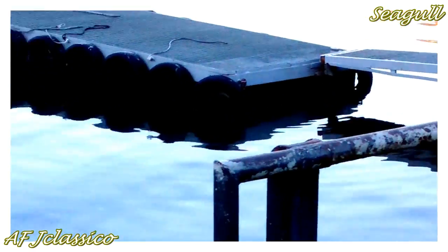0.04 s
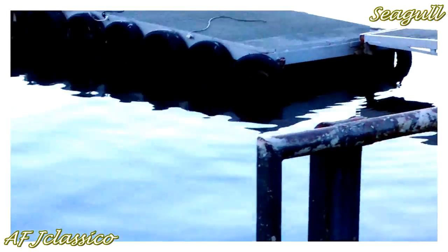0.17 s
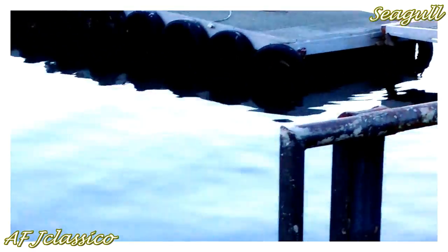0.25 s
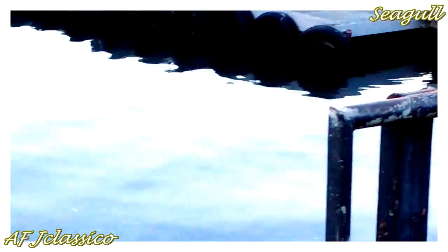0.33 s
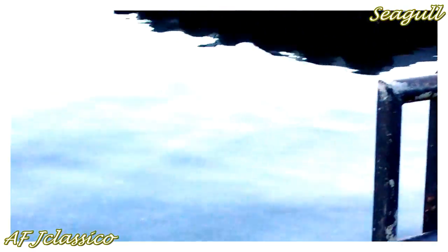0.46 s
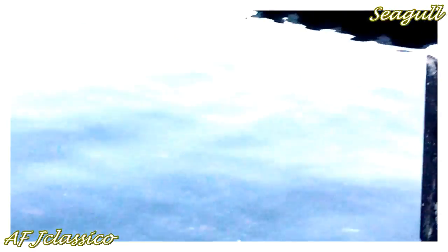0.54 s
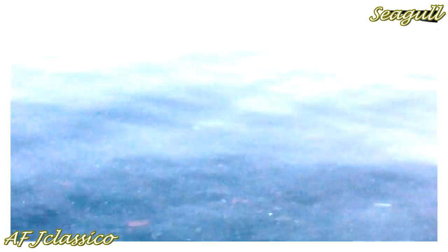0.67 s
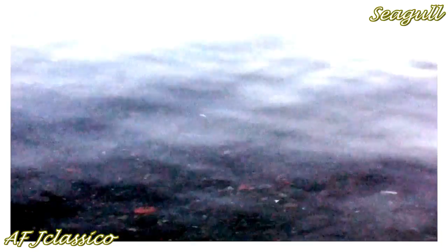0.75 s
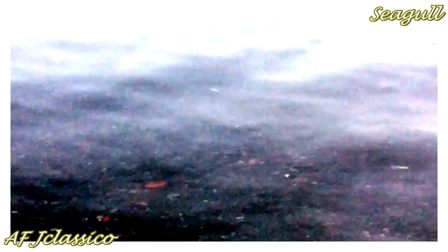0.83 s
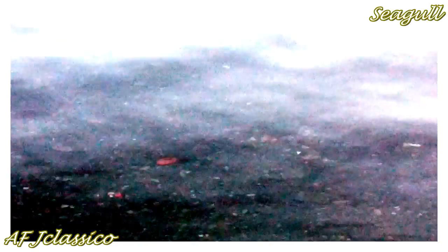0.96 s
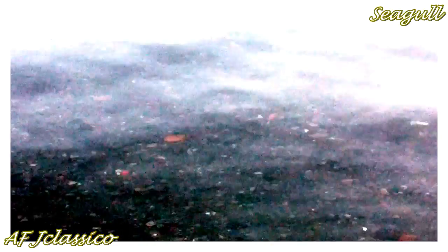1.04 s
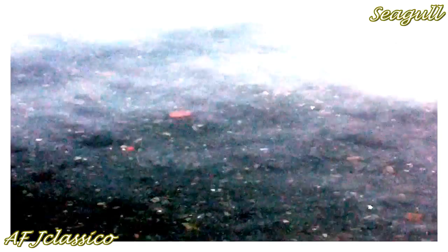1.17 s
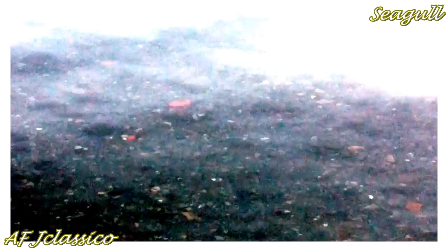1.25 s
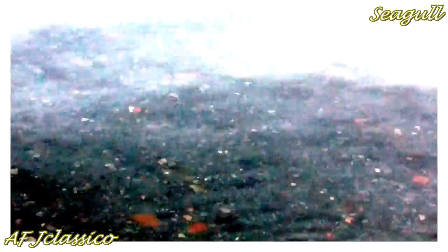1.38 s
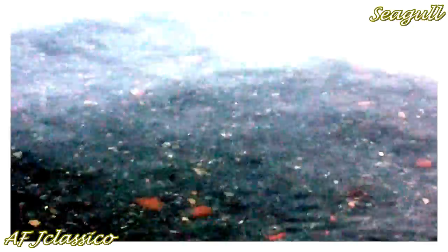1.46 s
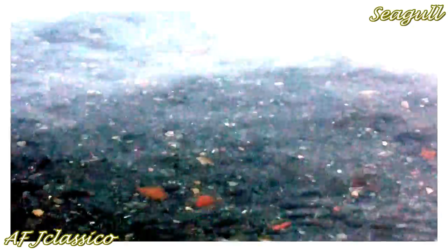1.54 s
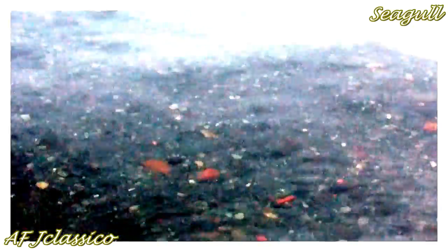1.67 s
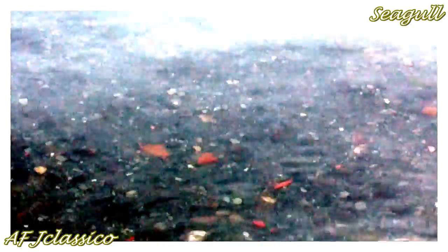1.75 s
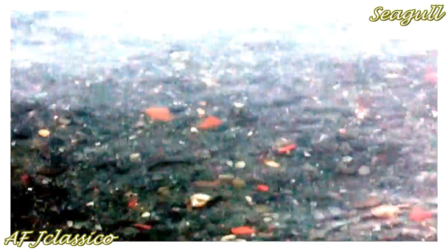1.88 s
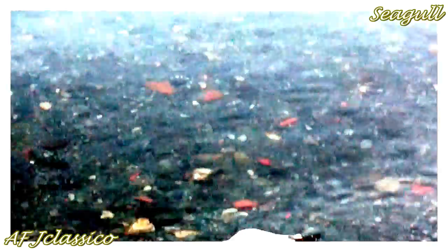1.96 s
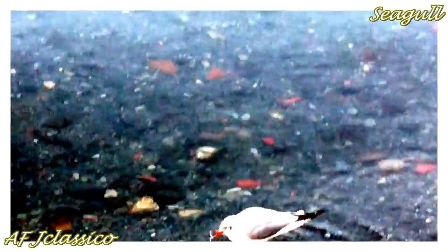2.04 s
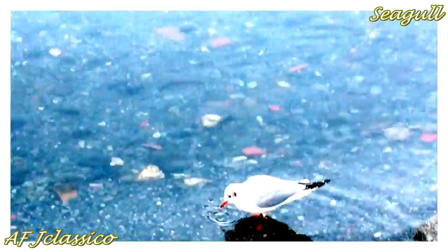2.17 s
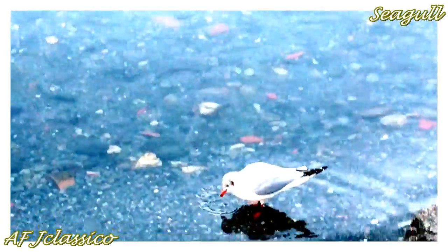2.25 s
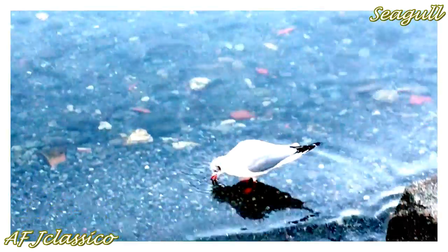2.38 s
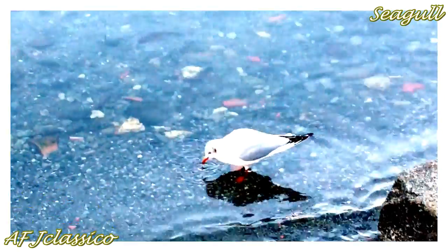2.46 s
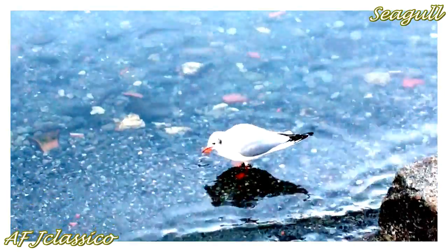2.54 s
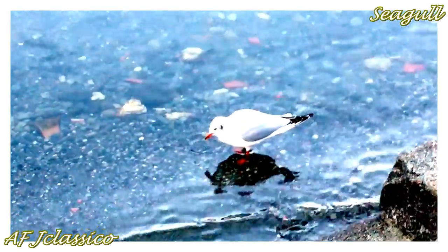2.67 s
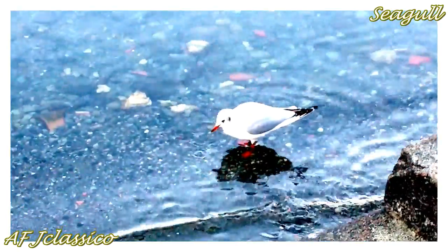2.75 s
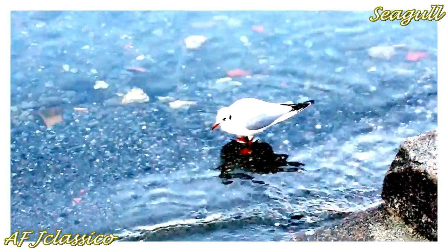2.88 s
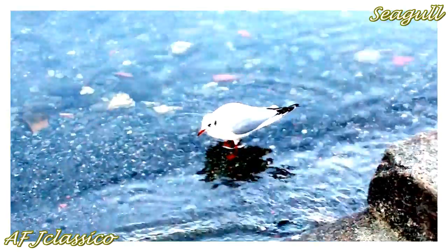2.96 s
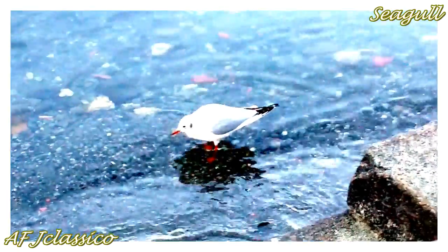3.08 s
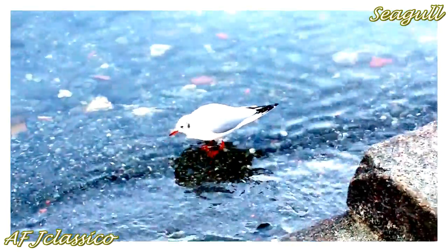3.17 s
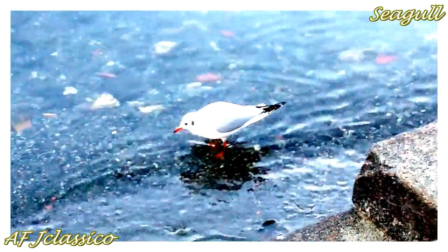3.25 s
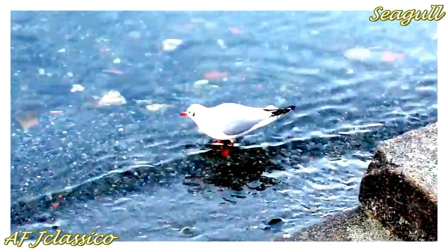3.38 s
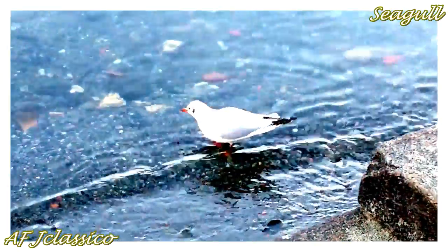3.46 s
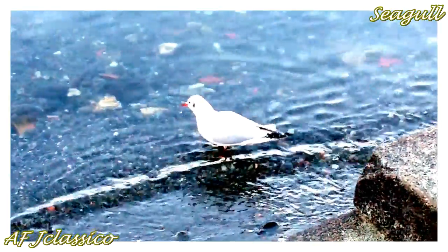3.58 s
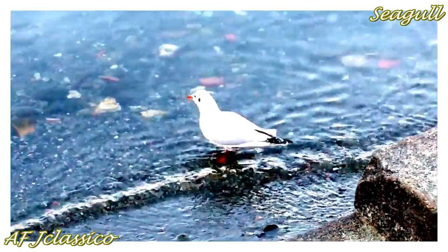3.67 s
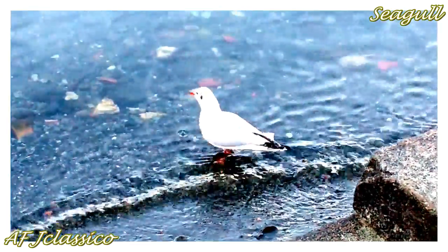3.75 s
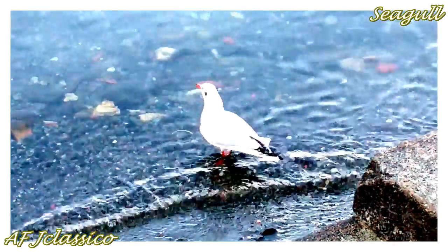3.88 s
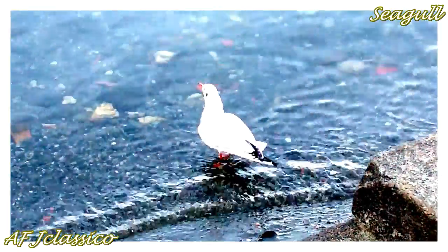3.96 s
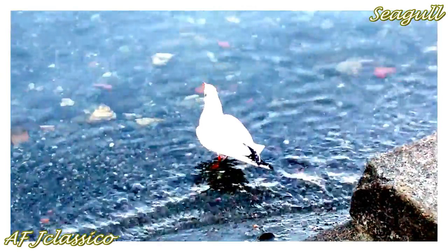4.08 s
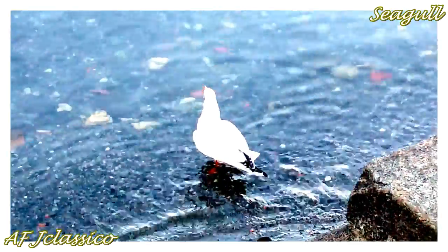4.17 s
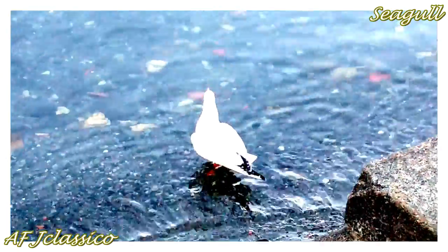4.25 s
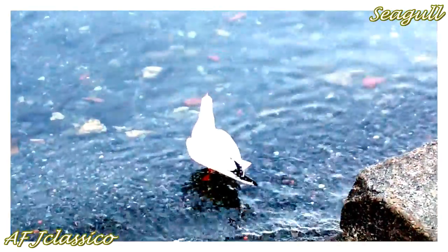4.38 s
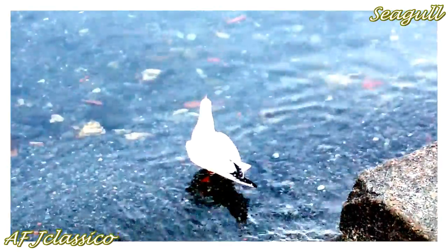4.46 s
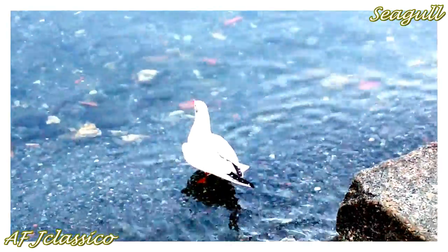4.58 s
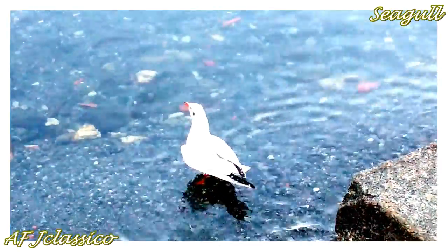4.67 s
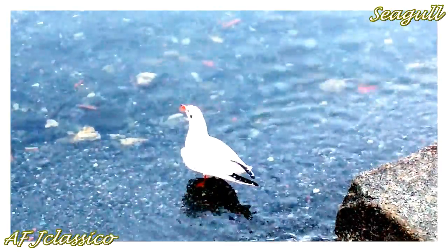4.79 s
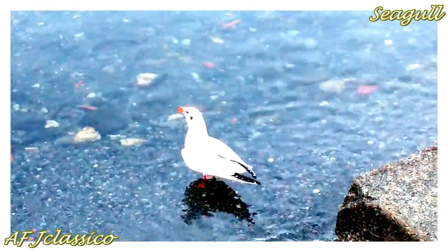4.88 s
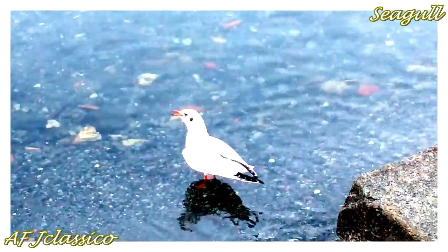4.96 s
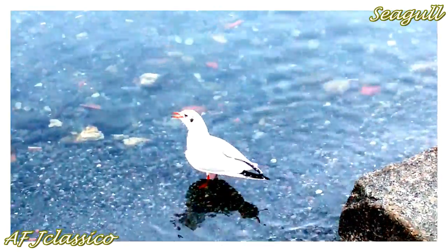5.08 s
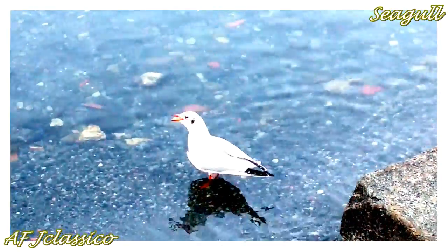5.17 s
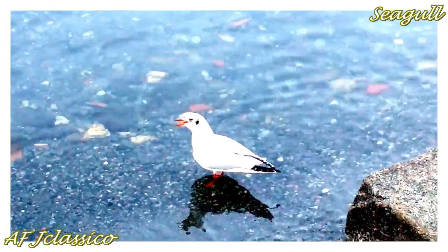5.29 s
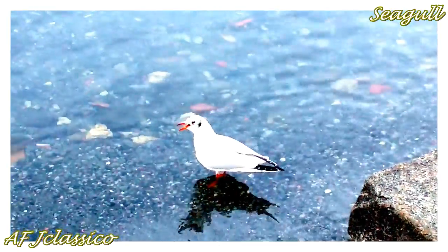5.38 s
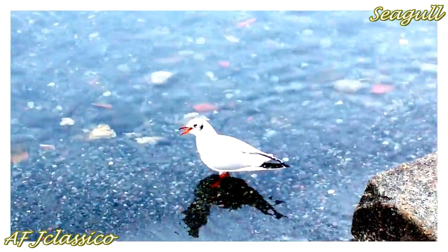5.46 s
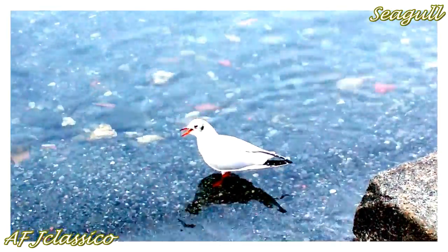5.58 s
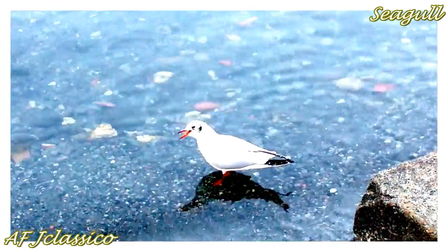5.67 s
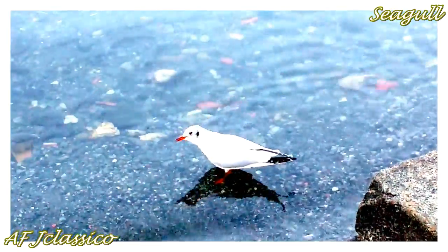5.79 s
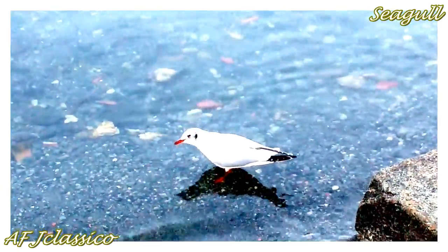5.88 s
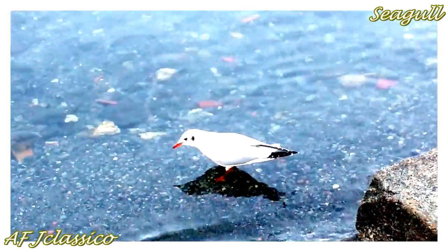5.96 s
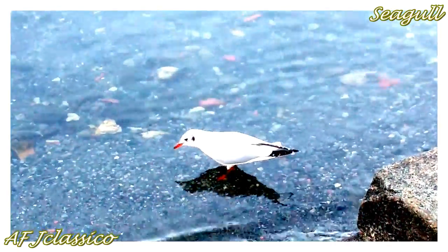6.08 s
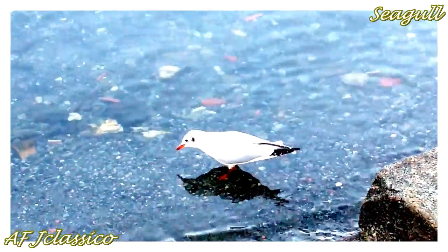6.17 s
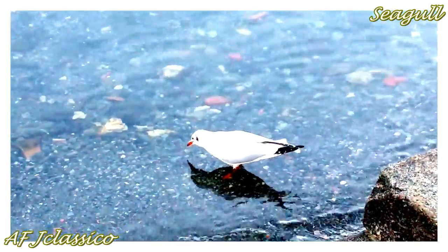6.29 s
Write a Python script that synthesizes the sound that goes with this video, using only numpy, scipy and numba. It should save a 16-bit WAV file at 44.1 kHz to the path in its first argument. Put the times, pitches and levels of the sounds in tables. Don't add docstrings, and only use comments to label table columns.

```python
import sys
import numpy as np
from scipy import signal
from scipy.fft import rfft, irfft, next_fast_len
from scipy.io import wavfile
from scipy.ndimage import uniform_filter1d
from numba import njit

SR = 44100
rng = np.random.default_rng(int(sys.argv[2]) if len(sys.argv) > 2 else 0)


def to_linear_factor(level_db):
    exponent = np.asarray(level_db, float) / 20
    return 10 ** exponent


def store_pcm(level_fs):
    pcm = np.round(np.clip(level_fs, -1, 1) * 32767).astype(np.int16)
    wavfile.write(sys.argv[1], SR, np.atleast_2d(pcm).T)


N = 279153

# (f/Hz, level/dB)
RUSH_COLOUR = [(15, -43), (25, -13.5), (80, -2.5), (130, -5.5), (161, -7), (195, -6), (317, -10),
               (439, -15.5), (641, -12.5), (734, -14), (863, -13), (1070, -13), (2050, -22.5),
               (3160, -33.5), (16000, -44.5)]
# (f/Hz, left-right level/dB, likeness/0-1)
RUSH_SIDES = [(60, 0.6, 0.99), (296, -2, 0.98), (680, -1, 0.82), (1260, -4.5, 0.89), (2200, -6.5, 0.48),
              (3360, 1, 0.3), (8440, -4, 0), (14100, 2, 0.2)]
# (f/Hz, left-right level/dB, likeness/0-1)
RIGHT_SIDES = [(600, 0, 0), (1200, -5.5, 0), (2000, -6, 0), (2740, 1, 0), (5430, -15.5, 0),
               (8400, -69, 0.3), (14400, -9, 0.1)]
# (f/Hz, left-right level/dB, likeness/0-1)
AHEAD_SIDES = [(920, 2.5, 0.24), (1420, 8.5, 0.28), (2000, 6.5, 0.081), (3420, 0, 0.14),
               (5560, -19.5, 0.56), (8000, -48, .2)]
# (f/Hz, delay/s)
RIGHT_DELAY = [(200, 0.0003), (950, 0.00024), (1210, 0.00037), (2200, 0.0004594)]
# (t/s, peak level/dB)
WATER_TICKS = [(0.1685, -48), (0.1836, -40), (0.3264, -37), (0.4444, -61), (0.545, -37), (0.559, -60),
               (0.5617, -32.5), (0.632, -38), (0.666, -37), (0.7078, -64), (0.763, -29.5), (0.8844, -50),
               (1.0056, -38), (1.1024, -47), (1.1706, -43), (1.245, -38), (1.313, -39), (1.3494, -43),
               (1.637, -42.5), (1.658, -45), (1.698, -39), (2.939, -43), (3.2144, -49)]
# (t/s, level/dB, f/Hz, length/s)
WATER_DROPS = [
    (.452, -44, 3800, .0025),
    (.536, -47, 3400, .0025),
]

# (t/s, effort level/dB, bill opening/0-1, high windpipe f/Hz, bursts/Hz)
LONE_CALLS = [
    [(1.72, -55, 0.15, 2100, 94), (1.742, -44.5, 0.7, 2100, 89), (1.788, -40.5, 0.61, 2070, 90.1),
     (1.872, -39.5, 0.56, 2120, 86.5), (1.936, -38.5, 0.61, 2130, 90.3), (2.168, -36.5, 0.48, 1950, 80),
     (2.19, -41, 0.4, 1840, 81)],
    [(2.19, -40, 0.21, 1990, 73), (2.368, -46, 0.35, 1860, 69.46), (2.494, -46, 0.34, 1870, 55.74),
     (2.682, -49, 0.34, 1820, 54.5), (2.846, -51, 0.37, 1780, 51.9), (2.902, -53.5, 0.3, 1740, 51.3),
     (2.93, -72, 0.3, 1840, 54)],
]
QUARREL_CALLS = [
    [(3.44, -54, 0.081, 2090, 55), (3.474, -49.5, 0.15, 2000, 56.8), (3.604, -42, 0.45, 1770, 67.5),
     (3.656, -39, 0.6, 1840, 71.6), (3.74, -39, 0.44, 1730, 86), (3.852, -36.5, 0.38, 1620, 83.54),
     (4.058, -31.5, 0.58, 1820, 88.6), (4.176, -33.5, 0.77, 1850, 80.6), (4.21, -38, 0.35, 1700, 80.5)],
    [(4.352, -56, 0.35, 1880, 87), (4.361, -40.5, 0.87, 1780, 91.2), (4.472, -37.5, 0.89, 1650, 87.9),
     (4.556, -35, 0.82, 1630, 86.7), (4.6, -37.5, 0.9, 2090, 90.5), (4.618, -43.5, 0.82, 2000, 91),
     (4.63, -50, 0.27, 2000, 87.5)],
    [(4.77, -56, 0.37, 1950, 67.3), (4.779, -45.5, 0.91, 1690, 68.8), (4.802, -46, 0.94, 1790, 68.1),
     (4.91, -44, 1, 1650, 69.3), (4.95, -43.5, 0.3, 1730, 67.6)],
]
CHORUS_CALLS = [
    [(4.95, -39, 0.4, 1580, 85.6), (4.988, -32, 0.39, 1630, 78.5), (5.066, -28.5, 0.5, 1610, 78.9),
     (5.092, -33.5, 0.52, 1650, 83), (5.114, -27, 0.48, 1600, 82.6), (5.218, -30.5, 0.57, 1730, 85.4),
     (5.35, -25, 0.49, 1670, 78.3)],
    [(5.35, -25.5, 0.41, 1670, 77.4), (5.396, -27.5, 0.57, 1810, 84.7), (5.502, -28, 0.41, 1590, 81.9),
     (5.582, -29.5, 0.56, 1750, 71.8), (5.66, -28.5, 0.46, 1810, 84.5), (5.8, -30, 0.38, 1800, 76.6),
     (5.902, -32.5, 0.61, 2220, 69.6), (5.97, -38, 0.38, 2200, 68.5)],
    [(5.97, -34.5, 0.27, 1850, 66.6), (6.094, -37.5, 0.59, 1840, 73.6), (6.194, -32, 0.49, 1390, 83.5),
     (6.252, -34, 0.49, 1550, 81.3), (6.28, -35.5, 0.22, 1940, 61.5), (6.33, -32, 0.2, 1870, 57.6)],
]
# (t/s, low throat f/Hz, high throat f/Hz, bill f/Hz, gape f/Hz)
LONE_HOLLOWS = [
    [(1.72, 3990, 5430, 9800, 8050), (1.9, 4120, 5320, 9750, 7940), (2.0, 3950, 4860, 9300, 7600),
     (2.19, 3920, 5200, 9500, 8000)],
    [(2.19, 4550, 5340, 10050, 8400), (2.4, 4380, 5400, 9100, 8100), (2.55, 4160, 5500, 9040, 8000),
     (2.93, 3760, 5250, 8650, 7700)],
]
QUARREL_HOLLOWS = [
    [(3.44, 4970, 6600, 10100, 7800), (3.6, 4900, 6140, 10240, 7960), (3.68, 4460, 5200, 10200, 7600),
     (3.75, 4300, 5330, 8300, 7750), (3.83, 4780, 5430, 8050, 9200), (3.89, 4400, 5734, 7870, 9500),
     (4.0, 4340, 5757, 8000, 9000), (4.12, 4460, 5560, 7970, 9650), (4.21, 4700, 6600, 8260, 9830)],
    [(4.35, 5000, 5740, 8000, 5970), (4.43, 4880, 5500, 8400, 7100), (4.5, 5020, 5400, 8240, 6740),
     (4.52, 4590, 5470, 9600, 6500), (4.64, 4530, 5070, 8900, 6370)],
    [(4.77, 5100, 5430, 7700, 7050), (4.85, 4660, 5340, 8000, 7200), (4.95, 4300, 5570, 8000, 6500)],
]
CHORUS_HOLLOWS = [
    [(4.95, 4430, 5260, 8900, 7050), (5.1, 4400, 5370, 8800, 7100), (5.35, 4500, 5440, 9200, 7540)],
    [(5.35, 4210, 5500, 8400, 6230), (5.48, 4240, 4950, 8170, 6800), (5.62, 3900, 4830, 8514, 6640),
     (5.8, 3660, 4920, 8700, 6460), (5.9, 4900, 5454, 8500, 6700), (5.97, 4400, 4960, 8400, 6700)],
    [(5.97, 4400, 6150, 8650, 10700), (6.1, 4160, 5500, 8130, 10900), (6.2, 4220, 5140, 7370, 11200),
     (6.33, 4170, 5430, 8400, 12000)],
]

# (f at start/Hz, f once open/Hz, f at end/Hz, roughness/0-1)
BUZZ = [(630, 645, 630, .26), (625, 600, 510, .22), (350, 540, 550, .32), (600, 640, 610, .4),
        (540, 560, 560, .35), (520, 545, 560, .35), (580, 600, 720, .3), (540, 570, 600, .3)]
# (mouth near 2.5 kHz level/dB, mouth near 3.2 kHz level/dB, low throat level/dB,
# air above the bill level/dB, share of the low voice that bends round to both microphones/0-1)
COLOUR = [(-5.5, -8.5, -3.5, -1.5, 0), (-14, -7.5, 7.5, -0.5, 0), (-20, -8, -1, -1, 0.93),
          (-3, 3.5, 0, -1.5, 0.13), (-8, -3.5, -15, -4.5, 0.08), (-42, -11, -3.5, -26, 0.97),
          (-17.5, -5.5, -3, -2.5, 0.09), (-8, -8.5, 3.5, -1.5, 0.2)]
# (level at start/dB, level at end/dB)
LOW_PIPE_LEVEL = [(4, -7), (-3, 0.5), (-4, -1.5), (7.5, 0), (2.5, 4.5), (-3, -17), (-18.5, -8),
                  (-13.5, -10)]
# (f at start/Hz, f at middle/Hz, f at end/Hz)
LOW_PIPE_PITCH = [(1380, 1410, 1240), (1320, 1150, 1150), (1030, 1140, 1350), (1440, 1330, 1290),
                  (1200, 1110, 1370), (1200, 1300, 1370), (1394, 1240, 1420), (997, 1250, 1480)]
# (level/dB, ...)
BILL_SWELLS = [(-10, -11.5, -6, 2.5, 0.5, 2.5, 1.5), (12, 10.5, 6.5, 6.5, -4, -1, 4),
               (-7, 1, -1.5, 9.5, 2, -2.5, -8.5, -11.5), (-10, -3.5, -3.5, -5.5, -10.5, -11.5, -18),
               (-21, -16.5, -14, -1), (0, 3, 1.5, -4, -5, -6), (2, 3, 2, 2.5, -3.5, -3, -2),
               (-2, -2, -7, -7, -2.5, 3)]
GAPE_SWELLS = [(-9, -10, -7, -12, -8, -14, -3), (12, 7.5, -1, -2, -11, -5, -5),
               (-3, 1.5, 1.5, 5, 2, -14, -6, -19), (-9, -6, -10, -5, -10, -4, -8), (-22, -21, -27, -18),
               (-5, -4, -5, -7, -9, -4), (-2, -3, -5, -3, -14, 0, 0), (-8.5, -12, -7.5, -5, -10, -22)]
# (level/dB, ...)
HIGH_THROAT_SWELLS = [(-7, 4.5, -1, -3, -4.5, -4, -2), (1, -4, -11, 2, -2.5, -4, 8),
                      (3, 3, -6, 2, 0.5, 5, -5, -2), (7, -3, -3, -5.5, -16, -6.5, -4), (-2, -2, -7, 5),
                      (-3, 3, 2, -3, -9, -5), (-12, -1, -5.5, 4, 1, 1, 3), (-13, 3, -7, -9, -2, 0)]
AIR_SWELLS = [(15, -4, -5, 2), (-2, -1.5, 4, 7), (15, -5, 2.5, 1), (-1, 0, 3, 5), (5, -2, -1, -3),
              (-3, -5, 3, 13), (-6, 1.5, 1, -8), (10, -3, -4, -7)]
# (level at start/dB, level at middle/dB, level at end/dB)
BURST_DIPS = [(-14, -15, -18), (-22, -26, -26), (-15, -11, -22), (-10, -14, -28), (-18, -24, -28),
              (-13, -14, -17), (-15, -18, -24), (-15, -18, -22)]
# (level/dB, ...)
LOW_THROAT_SWELLS = [(-.5, -.5, -.5, -.5), (-.5, -0.54, -.5, -0.54), (1, -7, 5.5, -5, 1, -4.5),
                     (-2, 0, 2.5, -2.5, -3), (-3, -9, 12), (-.5, -.5, -.5, -.5),
                     (-.5, -0.46, -.5, -0.55, -.5), (4, -11, -4, -1, -7)]
SECOND_BEATS = [(.15, .05, .05), (.05, .1, .1), (.2, .35, .15), (.2, .55, .5, .05, .05), (.05, .05, .05),
                (.45, .3, .15), (.15, .25, .15, 0), (.2, .45, .2)]
# (level/dB, ...)
MOUTH_SWELLS = [(-0.46, .5, -.5, -.5), (-.5, -.5, -.5, -.5), (-.5, -.5, -0.46, -0.54, -.5, -.5),
                (-.5, -.5, -0.45, -.5, -.5), (1.5, -.5, 1), (1.5, 1.5, 1.3, 1.5), (-.5, -.5, -.5, -.5, -.5),
                (-0.62, 1.5, 1.7, -0.62)]

# (t/s, f/Hz, level/dB)
WHISTLES = [
    [(3.445, 1068, -68), (3.5, 1440, -58), (3.58, 1835, -44), (3.68, 1926, -42)],
    [(3.72, 1668, -44), (3.86, 1511, -39.5), (4.0, 1564, -42), (4.14, 1607, -36.5), (4.19, 1612, -35.5),
     (4.24, 1522, -36.5), (4.33, 1440, -37.5), (4.45, 1200, -47)],
    [(4.94, 1031, -44.5), (5.0, 1435, -38), (5.08, 1595, -41.5), (5.2, 1577, -34), (5.3, 1493, -37.5),
     (5.42, 1699, -35), (5.52, 1614, -34.5), (5.6, 1375, -42), (5.72, 1340, -43)],
    [(5.44, 1829, -36.5), (5.53, 2125, -31), (5.65, 1927, -35.5), (5.8, 1642, -35.5), (5.86, 1740, -45),
     (5.95, 1765, -38.5), (6.04, 1853, -70), (6.14, 1784, -52)],
    [(5.995, 874, -51), (6.07, 1066, -39.5), (6.13, 1130, -39.5), (6.18, 1230, -41), (6.25, 1245, -38.5),
     (6.28, 1246, -48)],
    [(5.46, 674.6, -72), (5.56, 650, -53), (5.68, 586, -52), (5.82, 523, -55)],
]
# (bursts at start/Hz, bursts at end/Hz, left-right level/dB)
WHISTLE_RATTLE = [(55, 110, -2), (67.3, 73, 2.5), (79.24, 80, 6.5), (75.13, 53, 0), (90.4, 66, 10.5),
                  (76.5, 70, 9)]
# (f/Hz, width/Hz, level/dB)
WHISTLE_BILL = [(3890, 940, -12), (5500, 430, -11.5), (7750, 1700, -19), (15200, 910, -33)]
# (t/s, level/dB, f/Hz, length/s)
HARD_BURSTS = [
    (5.0595, -15, 1560, 0.0071),
    (5.1105, -15, 1510, 0.0042),
    (5.1395, -12, 1540, 0.0033),
    (5.1665, -22, 1664, 0.0027),
    (5.1895, -13, 1572, 0.0035),
]


def rms_one(x):
    return x / np.sqrt(np.mean(x ** 2) + 1e-20)


def drift(count, rate):
    r = np.exp(-2 * np.pi * rate / SR)
    wander = signal.lfilter([1], [1, -2 * r, r * r], rng.standard_normal(count + 4000))
    return rms_one(wander[4000:])


def at_hz(points, hz):
    at, *columns = np.transpose(points)
    return [np.interp(np.log(hz + 1), np.log(at), c) for c in columns]


def at_time(rows, t):
    s, *columns = np.transpose(rows)
    return [np.interp(t, s, c) for c in columns]


def slide(count, stops):
    return np.interp(np.linspace(0, len(stops) - 1, count), np.arange(len(stops)), stops)


def two_ports(pair, sides, lag_share):
    size = next_fast_len(pair.shape[1] + 64)
    hz = np.arange(size // 2 + 1) * SR / size
    left_db, alike = at_hz(sides, hz)
    lag_s, = at_hz(RIGHT_DELAY, hz)
    same, other = rfft(pair, size)
    left = to_linear_factor(left_db) * (alike * same + np.sqrt(1 - alike ** 2) * other)
    right = same * np.exp(-2j * np.pi * hz * lag_s * lag_share)
    return irfft([left, right], size)[:, :pair.shape[1]]


def rush():
    size = next_fast_len(N)
    colour_db, = at_hz(RUSH_COLOUR, np.arange(size // 2 + 1) * SR / size)
    pair = irfft(rfft(rng.standard_normal((2, size))) * to_linear_factor(colour_db), size)[:, :N]
    level_db = -41.5 + .5 * drift(N, 3.9)
    return to_linear_factor(level_db) * two_ports(rms_one(pair), RUSH_SIDES, 0.84)


def lapping():
    clicks = np.zeros(N)
    for s, peak_db in WATER_TICKS:
        clicks[round(s * SR)] = to_linear_factor(peak_db)
    per_s = 2500 * to_linear_factor(5 * drift(N, 6))
    falls = rng.random(N) < per_s / SR
    sizes = to_linear_factor(7.1 * np.minimum(rng.exponential(1, N), 4)) * falls
    trickle_db = -78.5 - 13 * np.arange(N) / SR
    clicks += sizes * to_linear_factor(trickle_db)
    r = np.exp(-1 / (0.0016 * SR))
    puffs = signal.lfilter([1], [1, -r], clicks) * rng.standard_normal((2, N))
    band = signal.butter(2, [5800, 12000], "band", fs=SR, output="sos")
    return signal.sosfilt(band, puffs) * to_linear_factor([[-16], [0]])


def drops(rows):
    out = np.zeros(N)
    for s, level_db, hz, length in rows:
        t = np.arange(round(length * SR)) / SR
        tone = np.sin(2 * np.pi * hz * t * (1 + 0.013 * t / length))
        blip = tone * np.sin(np.pi * t / length) ** 2
        out[round(s * SR):][:len(t)] += to_linear_factor(level_db) * blip
    return out * to_linear_factor([[-3], [1.5]])


def played(rows):
    at = np.arange(round(rows[0][0] * SR), min(round(rows[-1][0] * SR), N))
    return at, at_time(rows, at / SR)


def bursts(per_s, dip_db, uneven_db, sharp):
    turn = np.cumsum(per_s * (1 + .018 * drift(len(per_s), 30))) / SR
    strength = to_linear_factor(uneven_db * rng.standard_normal(200))[turn.astype(int)]
    place = turn % 1
    swell = np.sin(np.pi * place ** 0.49) ** (2 * sharp)
    return place, to_linear_factor(dip_db) + strength * swell


def faded(count, edge_s):
    i = np.arange(count)
    return np.clip(np.minimum(i, count - i) / (edge_s * SR), 0, 1)


@njit
def resonate(x, spring, damping):
    y = np.zeros_like(x)
    for c in range(x.shape[0]):
        for i in range(2, x.shape[1]):
            y[c, i] = x[c, i] - x[c, i - 2] + spring[i] * y[c, i - 1] - damping * y[c, i - 2]
    return y


def cavity(x, hz, width_hz):
    r = np.exp(-np.pi * width_hz / SR)
    wobbling_hz = hz * (1 + .008 * drift(x.shape[1], 14))
    spring = 2 * r * np.cos(2 * np.pi * wobbling_hz / SR)
    y = resonate(resonate(x, spring, r * r), spring, r * r)
    even = y / np.sqrt(uniform_filter1d(y ** 2, 2600) + 1e-20)
    return to_linear_factor(1.1 * drift(x.shape[1], 9)) * even


def buzz(place, start_hz, open_hz, end_hz, rough):
    count = len(place)
    glide_hz = np.interp(np.linspace(0, 1, count), [0, .22, 1], [start_hz, open_hz, end_hz])
    hz = glide_hz * (1 + .14 * (place - .45) + .1 * rough * drift(count, 120))
    cycle = np.floor(np.cumsum(hz) / SR)
    new_cycle = np.diff(cycle, prepend=0) > 0
    return rms_one(new_cycle * to_linear_factor(4 * rough * rng.standard_normal((2, count))))


def screech(rows, manner, colour, low_level, low_pitch, hollows, bill_stops, gape_stops, upper_stops,
            air_stops, dips, throat_stops, beats, mouth_stops):
    at, (effort_db, opening, pipe_hz, per_s) = played(rows)
    count = len(at)
    throat_hz, upper_hz, bill_hz, gape_hz = at_time(hollows, at / SR)
    start_hz, open_hz, end_hz, rough = manner
    lower_mouth_db, upper_mouth_db, throat_db, air_db, bend = colour

    mid_db = effort_db - 24.5 + 41.5 * opening
    top_db = mid_db + 7.5 * (opening - .5)
    low_db = effort_db + slide(count, low_level)
    bill_db = top_db + slide(count, bill_stops)
    gape_db = top_db + slide(count, gape_stops)
    upper_db = slide(count, upper_stops)
    throat_db = throat_db + slide(count, throat_stops)
    air_db = air_db + slide(count, air_stops)
    mouth_swell_db = slide(count, mouth_stops)
    lower_mouth_db = lower_mouth_db + mouth_swell_db
    upper_mouth_db = upper_mouth_db + mouth_swell_db

    place, swell = bursts(per_s, slide(count, dips), uneven_db=.9, sharp=1.15)
    pulses = buzz(place, start_hz, open_hz, end_hz, rough)
    breath = rng.standard_normal(pulses.shape)
    deep = swell * (pulses + 1.5 * rough * breath)
    rasp = pulses + 1.9 * rough * breath
    half_burst = round(.42 * SR / per_s.mean())
    split = swell ** 1.15 + slide(count, beats) * np.roll(swell, half_burst) ** 2
    source = (np.roll(split, round(.0009 * SR)) + .05) * rasp
    airy = (np.roll(split, round(-.0011 * SR)) + .05) * rasp
    mouth = (swell + .45) * rasp

    stretch = np.interp(np.linspace(0, 1, count), [0, .2], [start_hz / open_hz, 1])
    low_hz = slide(count, low_pitch) * stretch
    climb = 1 + .1 * (place - .4)
    low = to_linear_factor(low_db) * cavity(deep, low_hz * climb, 425) * faded(count, 0.0041)
    voice = np.sqrt(1 - bend) * to_linear_factor(5.5) * low
    voice -= to_linear_factor(effort_db + 5.0) * cavity(np.roll(deep, 60, axis=1), pipe_hz * climb, 415)
    voice += to_linear_factor(effort_db + lower_mouth_db) * cavity(mouth, 1.32 * pipe_hz, 380)
    voice -= to_linear_factor(effort_db + upper_mouth_db) * cavity(mouth, 2.62 * low_hz, 700)
    throat = to_linear_factor(upper_db) * cavity(source, upper_hz, 480)
    throat += .3 * cavity(source, (upper_hz + throat_hz) / 2, 1500)
    throat -= to_linear_factor(throat_db) * cavity(source, throat_hz, 400)
    throat -= .33 * cavity(source, 1.15 * upper_hz, 800)
    voice += to_linear_factor(mid_db + 3) * throat
    bill = cavity(airy, bill_hz, 870) - 0.2 * cavity(airy, 9300, 1900)
    voice += to_linear_factor(bill_db + 4.5) * bill
    voice -= to_linear_factor(gape_db + 3.5) * cavity(airy, gape_hz, 1400)
    air = cavity(airy, 1.246 * bill_hz, 960) - 0.59 * cavity(source, 11600, 3500)
    voice += to_linear_factor(bill_db - 4.0 + air_db) * air
    voice += to_linear_factor(mid_db - 17.0) * cavity(source, 14960, 900)
    bent = np.sqrt(bend) * low * [[1], [.4]]
    return at, voice * faded(count, 0.0013), bent


def whistle(rows, rattle):
    at, (hz, level_db) = played(rows)
    start_per_s, end_per_s, side_db = rattle
    per_s = slide(len(at), (start_per_s, end_per_s))
    place, swell = bursts(per_s, -21, uneven_db=1.2, sharp=.8)
    sliding_hz = hz * (1 + .22 * (place - .5) + .02 * drift(len(at), 120))
    turn = 2 * np.pi * np.cumsum(sliding_hz) / SR
    tone = np.sin(turn) + to_linear_factor(-27) * np.sin(2 * turn)
    tone += to_linear_factor(-14.5) * np.sin(turn / 1.5) + to_linear_factor(-17) * np.sin(turn / .75)
    breath = swell * rng.standard_normal((2, len(at)))
    voice = rms_one(swell * tone) * [[1], [0]] + to_linear_factor(-14) * cavity(breath, hz, 600)
    for centre_hz, width_hz, db in WHISTLE_BILL:
        voice += to_linear_factor(db) * cavity(breath, centre_hz, width_hz)
    voice = to_linear_factor(level_db + 7.5) * voice * faded(len(at), 0.0034)
    return at, two_ports(voice, AHEAD_SIDES, 0) * to_linear_factor([[side_db / 2], [-side_db / 2]])


def flock(calls):
    out = np.zeros((2, N))
    for at, voice in calls:
        out[:, at] += voice
    return out


def water_bounce(x, delay_s, wander_s, share):
    lag = SR * (delay_s + wander_s * np.array([drift(N, 1.5), drift(N, 1.5)]))
    i = np.arange(N)
    late = [np.interp(i - d, i, v) for v, d in zip(x, lag)]
    high = signal.butter(2, 2600, "high", fs=SR, output="sos")
    return x - share * signal.sosfilt(high, late)


def shore(x, t60):
    t = np.arange(round(t60 * SR)) / SR
    tail = rng.standard_normal((2, len(t))) * to_linear_factor(-60 * t / t60) * (t > .006)
    tail = signal.lfilter([1], [1, -.25], tail)
    tail = tail / np.sqrt(np.sum(tail ** 2) / 2)
    return signal.fftconvolve(x, tail, axes=1)[:, :N]


def scene():
    water = rush() + lapping() + drops(WATER_DROPS)
    calls = LONE_CALLS + QUARREL_CALLS + CHORUS_CALLS
    hollows = LONE_HOLLOWS + QUARREL_HOLLOWS + CHORUS_HOLLOWS
    settings = zip(calls, BUZZ, COLOUR, LOW_PIPE_LEVEL, LOW_PIPE_PITCH, hollows, BILL_SWELLS, GAPE_SWELLS,
                   HIGH_THROAT_SWELLS, AIR_SWELLS, BURST_DIPS, LOW_THROAT_SWELLS, SECOND_BEATS, MOUTH_SWELLS)
    screeches = [screech(*one) for one in settings]
    direct = flock((at, voice) for at, voice, bent in screeches)
    round_body = flock((at, bent) for at, voice, bent in screeches)
    gulls = two_ports(direct, RIGHT_SIDES, 0.93) + two_ports(round_body, AHEAD_SIDES, 0)
    gulls += flock(whistle(*one) for one in zip(WHISTLES, WHISTLE_RATTLE))
    gulls += drops(HARD_BURSTS)
    gulls = water_bounce(gulls, delay_s=.0011, wander_s=.00012, share=.25)
    echoes = to_linear_factor(-25) * shore(gulls, t60=.36)
    return gulls + echoes + water


def band_limit(x):
    return signal.sosfilt(signal.butter(12, 15850, fs=SR, output="sos"), x)


def record(dry):
    rounded = 0.77 * np.tanh(dry / 0.71)
    no_rumble = signal.butter(2, 32, "high", fs=SR, output="sos")
    no_top = signal.cheby2(16, 60, 16150, fs=SR, output="sos")
    mix = signal.sosfilt(np.vstack([no_rumble, no_top]), rounded)
    return band_limit(mix)


dry = scene()
out = record(dry)
store_pcm(out)
```